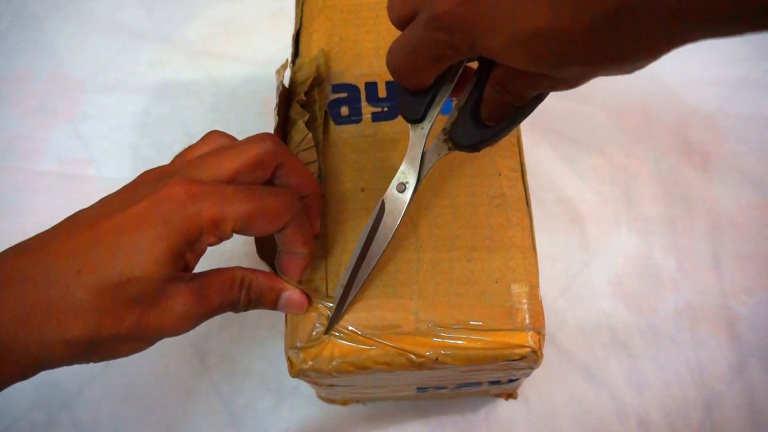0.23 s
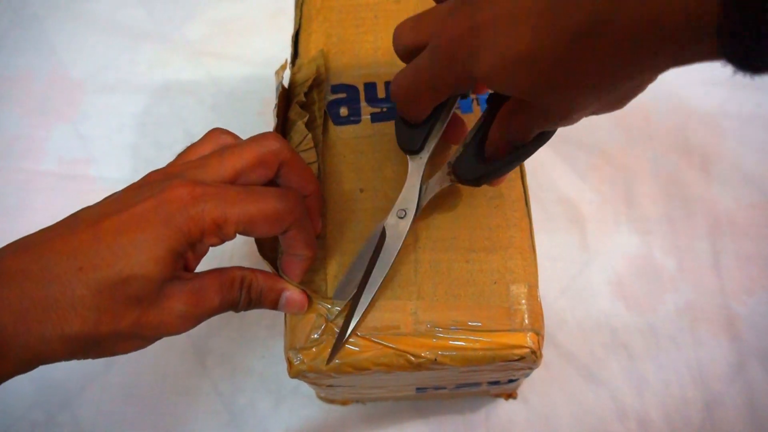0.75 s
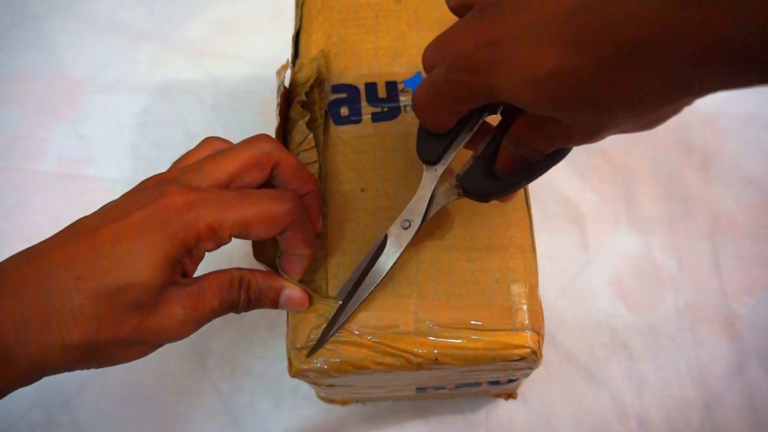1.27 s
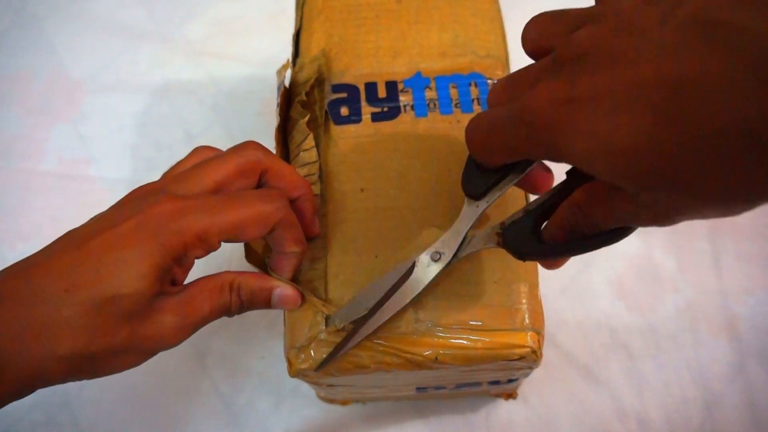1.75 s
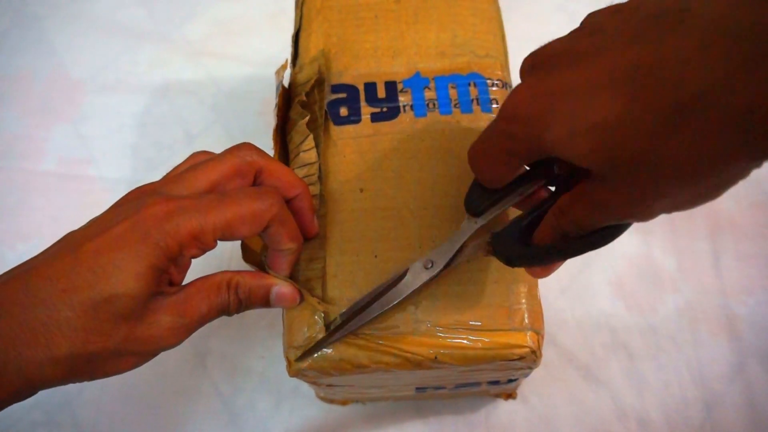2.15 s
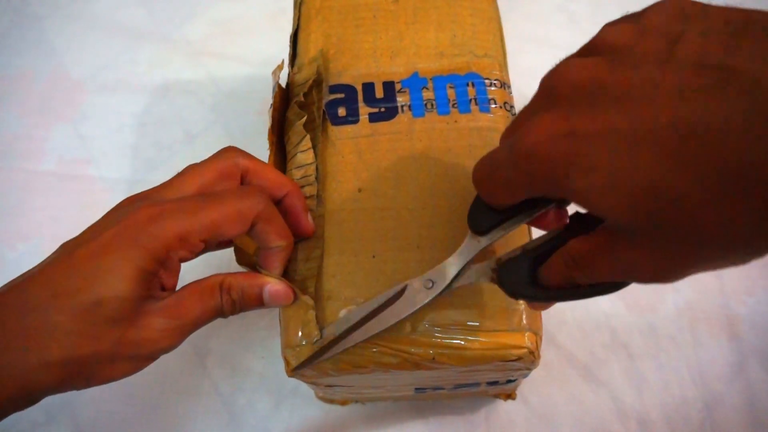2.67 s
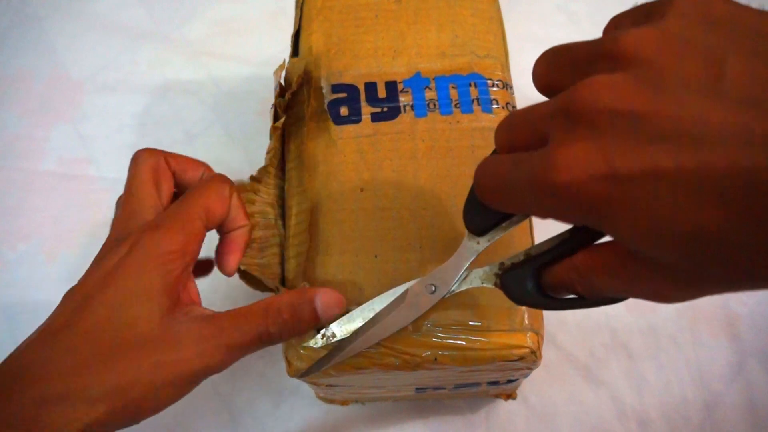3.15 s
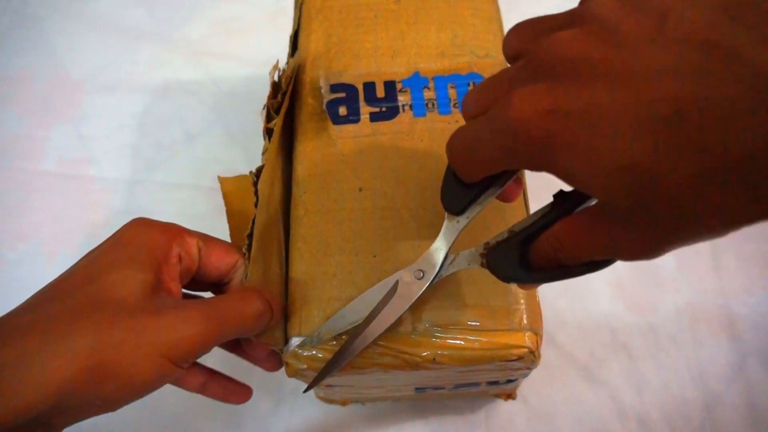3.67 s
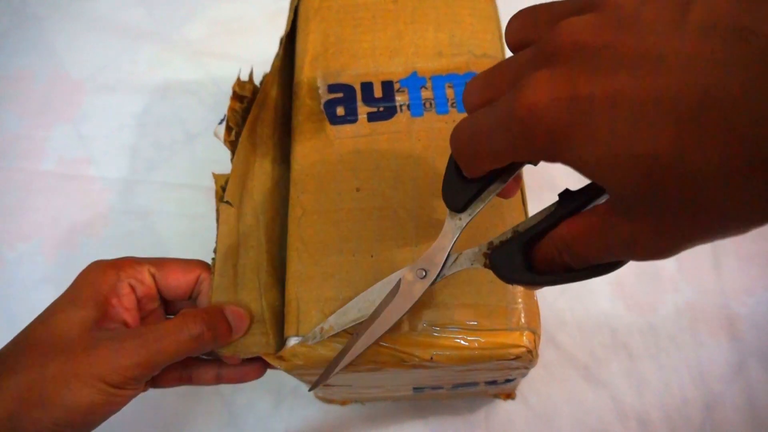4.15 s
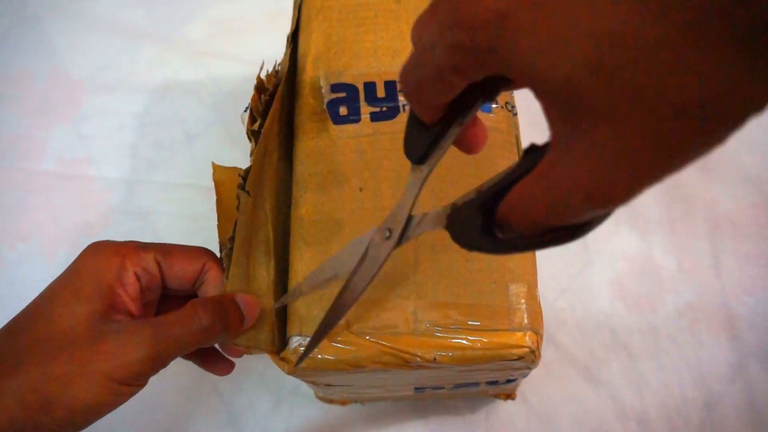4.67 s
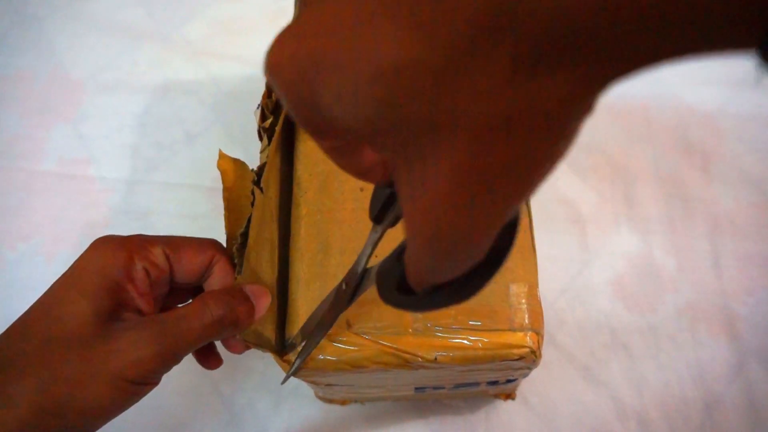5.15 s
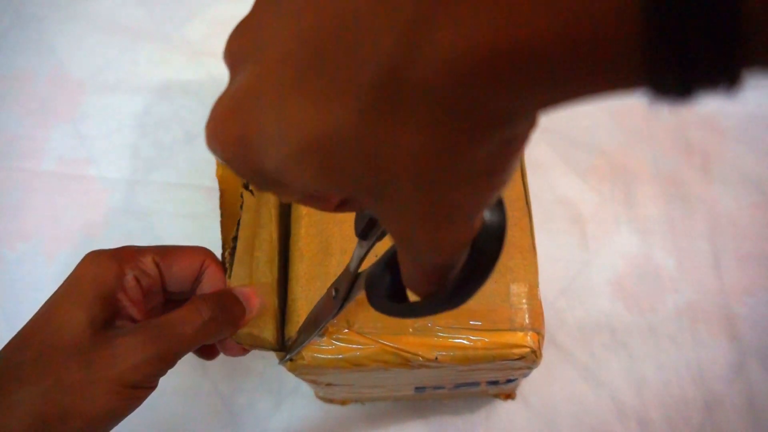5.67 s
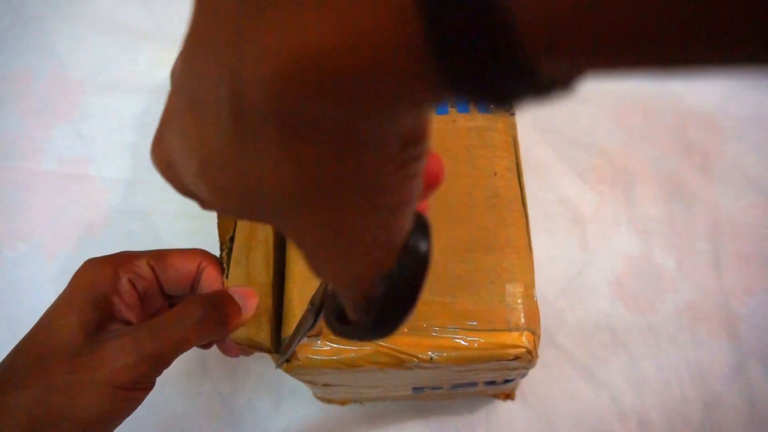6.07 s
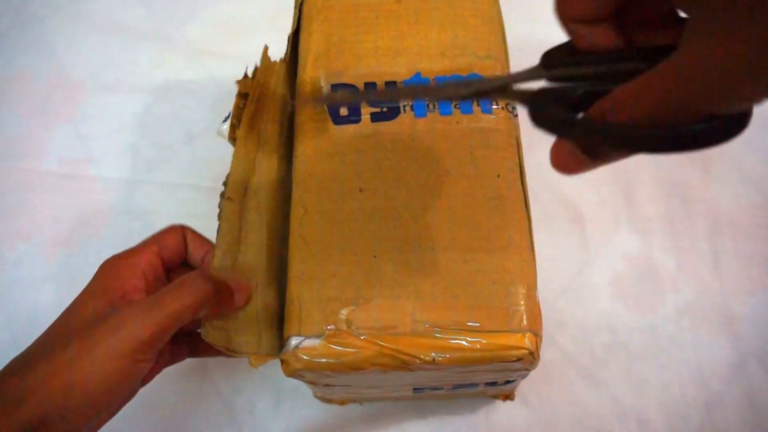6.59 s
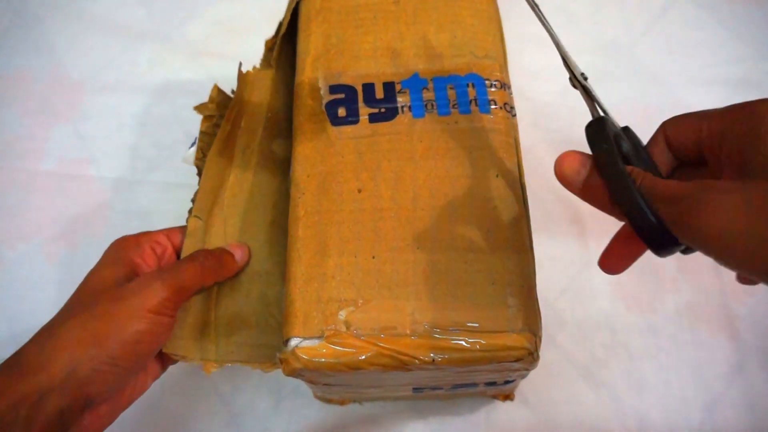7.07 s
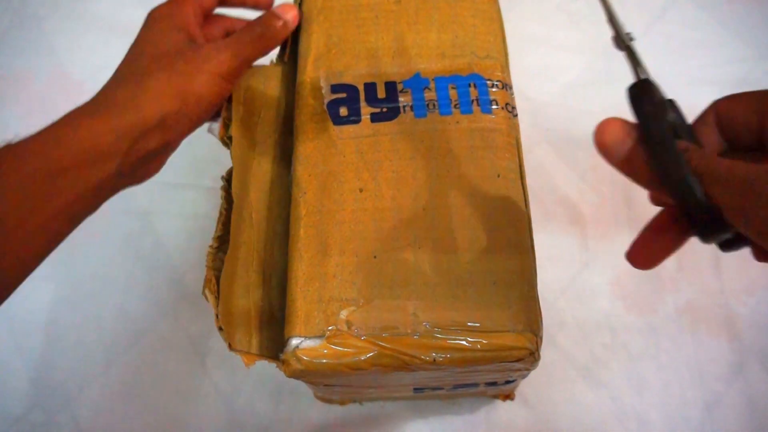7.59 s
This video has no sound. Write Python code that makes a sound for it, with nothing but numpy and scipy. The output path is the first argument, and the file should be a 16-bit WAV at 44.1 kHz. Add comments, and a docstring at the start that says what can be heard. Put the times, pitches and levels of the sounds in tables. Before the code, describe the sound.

Scissor blades dig into taped cardboard very close to the microphone. Dry, bright tape snaps and fine crackles come in irregular clusters, mixed with short fibrous rasps and dull card rubs. The strongest snaps fall around four seconds, then a quieter spell, then scraping and a loud snap with hollow box knocks at seven. A small bare room adds a short reverberant tail over soft room noise and faint hum.

```python
"""Scissors work through the packing tape of a cardboard box, close to a phone in a small bare room.
Tape snaps and crackles are short pulses shaped by the ring of the patch that gives way.
Blade and finger strokes are showers of grains and noise; box and blades are struck modes; bumps are thuds.
One wall echo and a tail of fading noise bands answer the work, over room noise and a faint hum."""
import sys
import numpy as np
from scipy import signal
from scipy.fft import rfft, irfft, next_fast_len
from scipy.io import wavfile
from scipy.ndimage import uniform_filter1d

SR = 44100
rng = np.random.default_rng(int(sys.argv[2]) if len(sys.argv) > 2 else 0)


def dump_mix(stems):
    """Bounce the given channels to the path in sys.argv[1] as a 16-bit WAV at rate SR."""
    frames = np.atleast_2d(stems).T  # one column per channel
    limited = np.clip(frames, -1, 1)  # hard clip at full scale
    pcm = np.round(limited * 32767).astype(np.int16)
    wavfile.write(sys.argv[1], SR, pcm)


N = 345303
TIME_S = np.arange(N) / SR


def undb(db):
    """Decibels to gain."""
    return 10 ** (np.asarray(db) / 20)


def unit(x):
    """Scale to rms 1."""
    return x / np.sqrt(np.mean(x ** 2))


def burst(x, seconds):
    """Scale to the energy that rms 1 has over the given time."""
    return x * np.sqrt(seconds * SR / np.sum(x ** 2))


def along(points, hz):
    """Read (frequency [Hz], value) points on a log-frequency axis."""
    f, value = np.transpose(points)
    return np.interp(np.log(hz + 1e-3), np.log(f), value)


def colour(x, points):
    """Filter by a spectrum of (frequency [Hz], level [dB]) points."""
    size = next_fast_len(len(x) + 2048)
    gain = undb(along(points, np.fft.rfftfreq(size, 1 / SR)))
    return irfft(rfft(x, size) * gain, size)[:len(x)]


def pulse(power):
    """Minimum-phase pulse: the sharpest causal one with a given power spectrum."""
    cepstrum = irfft(np.log(power + 1e-18) / 2)
    half = len(cepstrum) // 2
    folded = np.r_[cepstrum[0], 2 * cepstrum[1:half], np.zeros(half)]
    return irfft(np.exp(rfft(folded)))


def walk(rate_hz):
    """Smooth random wander, rms 1."""
    k = max(int(SR / rate_hz), 1)
    steps = np.repeat(rng.standard_normal(N // k + 1), k)
    return unit(uniform_filter1d(steps, k)[:N])


def add(track, time_s, x):
    """Mix a sound in at a given time."""
    i = max(int(time_s * SR), 0)
    track[i:i + len(x)] += x[:max(N - i, 0)]


def grains(rate_hz, spread_db):
    """Tiny fractures at random moments, most weak and a few strong."""
    size = undb(spread_db * np.minimum(rng.exponential(size=N), 4))
    struck_now = rng.random(N) < rate_hz / SR
    return unit(struck_now * size * rng.choice([-1, 1], N))


def spread(mid, other, side_db):
    """Two close microphone ports: diffuse sound differs a little between them."""
    side = colour(other, side_db)
    return np.array([mid + side, mid - side])


# room noise spectrum: (frequency [Hz], relative level [dB per Hz])
FLOOR_SPECTRUM = [(20, -13), (31, -1.5), (42, -17.5), (80, -5.5), (130, -2), (200, 1), (330, 1),
                  (480, -4.5), (720, -5.5), (1500, -9), (3000, -20), (5000, -26), (7700, -25), (10500, -39),
                  (16000, -36)]
# room noise width: (frequency [Hz], side minus mid [dB])
FLOOR_WIDTH = [(60, -17), (110, -11.5), (200, -13.5), (380, -8), (700, -4), (1290, -6.5), (2380, -4.5),
               (4400, -4), (8120, -20), (15000, -26)]
# hum tones: (frequency [Hz], mean level [dB])
HUM_TONES = [(31, -70), (149.5, -71), (199.2, -63), (249, -74.5)]


def background(floor_db=-49.5, hum_db=0, waver_db=0.47):
    """Near-steady filtered noise plus hum tones that waver in level and phase."""
    mid, other = (unit(colour(rng.standard_normal(N), FLOOR_SPECTRUM)) for _ in range(2))
    hum = np.zeros(N)
    for hz, db in HUM_TONES:
        level = undb(db + hum_db + 2 * walk(3.0))
        hum += level * np.sqrt(2) * np.sin(2 * np.pi * hz * TIME_S + 0.83 * walk(5))
    return spread(mid, other, FLOOR_WIDTH) * undb(floor_db + waver_db * walk(13)) + hum


# blade or finger strokes: (start [s], length [s], relative level of crisp tape and fibre rasp [dB],
# relative level of dull card rub [dB])
STROKE_EVENTS = [(0.0, 0.044, -48, -50), (0.06, 0.14, -64, -65), (0.548, .03, -51, -58),
                 (0.646, 0.25, -51.5, -52.5), (0.973, 0.043, -44.5, -47.5), (1.076, 0.17, -52, -58),
                 (1.224, 0.12, -48, -57), (1.368, 0.13, -40.5, -52.5), (1.51, .1, -57, -63),
                 (1.769, 0.03, -41, -47), (1.847, 0.042, -50, -54), (2.172, 0.023, -43, -44),
                 (2.251, 0.048, -46, -47), (2.725, 0.057, -46, -48), (2.812, 0.052, -42, -50.5),
                 (2.976, 0.095, -41.5, -50), (3.042, 0.04, -34, -42), (3.166, 0.07, -41, -40.5),
                 (3.27, 0.14, -43, -44.5), (3.379, 0.052, -37.5, -46.5), (3.457, 0.02, -36, -42.5),
                 (3.552, 0.03, -37.5, -44), (3.616, 0.11, -44.5, -56), (3.883, 0.071, -42, -54),
                 (4.056, 0.024, -36.5, -59), (4.1, 0.079, -50, -71), (4.418, 0.056, -53, -62),
                 (4.5, 0.016, -42, -45), (4.87, 0.11, -57.5, -60), (5.277, 0.025, -52, -65),
                 (5.498, 0.083, -58, -54.5), (5.562, 0.021, -55, -47.5), (5.865, 0.054, -52, -47.5),
                 (5.96, 0.032, -43, -55), (6.084, 0.15, -49.5, -52.5), (6.204, 0.18, -43.5, -51.5),
                 (6.496, .09, -51.5, -52), (6.582, 0.044, -43, -45), (6.65, 0.082, -43, -53),
                 (6.737, 0.057, -42.5, -48.5), (6.883, 0.11, -44.5, -45), (6.957, 0.15, -33.5, -41.5),
                 (7.092, 0.19, -50, -47), (7.305, 0.096, -42.5, -48.5), (7.5, 0.68, -46, -52)]


def strokes(attack_s=0.0098, release_s=0.03, rest_rasp_db=-65, rest_rub_db=-58.5):
    """Rasp and rub strength: strokes bite, hold and let go; between them the hands rest and shift on the box."""
    rasp_power = np.full(N, undb(rest_rasp_db) ** 2)
    rub_power = np.full(N, undb(rest_rub_db) ** 2)
    t = np.arange(SR) / SR
    for start_s, length_s, rasp_db, rub_db in STROKE_EVENTS:
        shape = np.minimum(t / attack_s, 1) * np.exp(-np.maximum(t - length_s, 0) / release_s)
        add(rasp_power, start_s, (undb(rasp_db) * shape) ** 2)
        add(rub_power, start_s, (undb(rub_db) * shape) ** 2)
    return np.sqrt(rasp_power), np.sqrt(rub_power)


# crisp rasp of tape and fibres: (frequency [Hz], relative level [dB per Hz])
RASP_SPECTRUM = [(900, -35), (2000, -16.5), (3200, -2), (5200, -3), (7400, 2), (8700, 2), (10500, -7),
                 (13000, -13), (16000, -18)]
# dull rub of the card: (frequency [Hz], relative level [dB per Hz])
RUB_SPECTRUM = [(70, -25), (130, -7), (230, -19), (400, -0.5), (750, 3), (1100, -7), (1700, 1.5),
                (2800, -9), (4500, -32), (9000, -53)]


def scraping(rasp, rub, rasp_db=-1.5, rub_db=-1.0, slip_db=2.5, fine=0.77):
    """Blade and fingers catch and slip: fibres break in showers over a finer hiss, and the card sounds below."""
    slip = unit(undb(slip_db * walk(90)))
    fibres = grains(rate_hz=2600, spread_db=3.5)
    crisp = unit(colour(fibres + fine * rng.standard_normal(N), RASP_SPECTRUM))
    coarse = grains(rate_hz=900, spread_db=2.0)
    dull = unit(colour(fibres + 0.61 * coarse, RUB_SPECTRUM))
    return slip * (crisp * rasp * undb(rasp_db) + dull * rub * undb(rub_db))


# body of a snap: (frequency [Hz], relative level [dB per Hz])
SNAP_SPECTRUM = [(100, -45), (700, -40), (2500, -56), (4400, -6.5), (5300, -9), (6300, -1), (7400, 6),
                 (8700, -1), (10500, -15.5), (13000, -74), (16000, -41)]
# bright edge of a snap: (frequency [Hz], relative level [dB per Hz])
EDGE_SPECTRUM = [(5000, -30), (8500, 17), (10000, 13), (13000, 5.5), (16000, -6)]


def snap(hz, ring_db, edge_db, ring_q=3.2, under_db=-3, over_db=-6, stiff_hz=6700, card_hz=800,
         card_db=-10, ripple_db=3.0, crumble=0.083, crumble_s=0.0017, size=512):
    """A sharp break crumbles for milliseconds; the freed patch rings a few cycles in uneven modes."""
    f, t = np.fft.rfftfreq(size, 1 / SR) + 1, np.arange(size) / SR
    detune = np.exp(np.array([.04, .18, .1]) * rng.standard_normal(3))
    modes_hz = hz * np.array([1, .52, 1.5]) * detune
    patch = np.zeros(len(f))
    for mode_hz, db in zip(modes_hz, [0, under_db, over_db]):
        patch += undb(2 * db) / (1 + (ring_q * (f / mode_hz - mode_hz / f)) ** 2)
    # smaller, stiffer patches radiate less below their own ring
    radiated = 1 / (1 + (hz ** 2 / stiff_hz / f) ** 10) + .015
    body, edge = (undb(2 * along(points, f)) for points in (SNAP_SPECTRUM, EDGE_SPECTRUM))
    power = np.zeros(len(f))
    for shape, db in [(body, 0), (patch, ring_db), (edge, edge_db)]:
        power += radiated * undb(2 * db) * shape / np.sum(shape * radiated)
    # tug on the card beneath
    card = 1 / (1 + (2 * (f / card_hz - card_hz / f)) ** 2)
    power = power + undb(2 * (ring_db + card_db)) * card / card.sum()
    # reflections off box and hands comb each snap differently
    ripple = ripple_db * unit(uniform_filter1d(rng.standard_normal(len(f)), size=7))
    force = (t == 0) + crumble * rng.standard_normal(size) * np.exp(-t / crumble_s)
    return burst(np.convolve(force, pulse(power * undb(2 * ripple))), power.sum() / 10 ** 3)


def crackle(rasp, rate_hz=55, base_db=-15, follow=0.64, spread_db=3.0, patch_hz=2500, ring_db=-5, edge_db=-8):
    """Strained tape gives way in many small snaps, stronger while the blades rasp."""
    out = np.zeros(N)
    for when, size, pitch, ring, edge in rng.random((int(rate_hz * N / SR), 5)):
        rarity = -np.log(size + 0.014)
        db = base_db + follow * 20 * np.log10(rasp[int(when * N)]) + spread_db * rarity
        hz = patch_hz * 2 ** (2 * pitch - 1)
        small_snap = snap(hz, ring_db + 12 * (ring - .5), edge_db + 14 * (edge - .5))
        add(out, when * N / SR, undb(db) * small_snap)
    return out


# loud tape snaps: (time [s], relative level [dB], patch ring [Hz], relative ring level [dB],
# bright edge relative to body [dB])
SNAP_EVENTS = [(0.013, -33.5, 3700, 0, -22), (0.072, -26.5, 4200, -3, -25), (0.1717, -47, 2400, -15, 10),
               (0.192, -44, 2400, -15, 9), (0.4123, -42, 3000, -6, -1), (0.4325, -36, 2980, -0.5, -10),
               (0.496, -43, 3420, 3, -17), (0.9983, -24, 2280, 1, -22), (1.0555, -28, 2950, -1.5, -8),
               (1.0992, -28.5, 2370, -7, -7), (1.1267, -24.5, 2930, 1, -13), (1.1855, -34, 1770, 3.5, 0),
               (1.232, -21.5, 2750, 1, -5), (1.3059, -22, 3720, -5.5, -3), (1.402, -25.5, 2240, -5, -6),
               (1.432, -37, 3720, -6, 8), (1.476, -23, 2870, -20, -8), (1.4885, -16.5, 3160, -13, -9),
               (1.4922, -23.5, 2530, 0.5, 3), (1.5475, -32, 3300, 3, -12), (1.6004, -17.5, 2400, -9.5, -9),
               (1.7718, -32, 2440, -7, -6), (1.8859, -34.5, 3790, -4, -5), (2.1834, -32, 2140, 6, -6),
               (2.2016, -29.5, 3850, -1, -16), (2.2522, -26, 3270, 1, -17), (2.265, -24.5, 4100, -4, -15),
               (2.274, -30, 2050, 10.5, -12), (2.2951, -20, 3010, -7.5, -7), (2.465, -39.5, 3330, 10, -12),
               (2.4999, -33, 1800, 2.5, 6), (2.5292, -37, 3100, 16, -14), (2.7065, -31.5, 3280, -4.5, -24),
               (2.8029, -25, 2190, 0, -4), (2.8092, -22, 2500, -0.5, -21), (2.9512, -31.5, 1580, 2, -12),
               (3.1867, -27.5, 3100, -3.5, -8), (3.365, -26, 4190, -2, -13), (3.473, -21, 2670, -15, -5),
               (3.572, -27.5, 3400, 3.5, 2), (3.6485, -28.5, 3100, 3, -13), (3.8166, -30.5, 2830, 6, -9),
               (3.8304, -23.5, 3690, -8, -17), (3.8547, -26, 3260, 0, -4), (3.8674, -23, 3370, -12, -7),
               (3.8877, -12.5, 2700, -1, -5.5), (3.9156, -14.5, 4670, -9.5, -7.5),
               (4.0363, -10.5, 4800, 2, -19), (4.41, -34, 4260, 6.5, -13), (4.434, -37.5, 4050, 4, -19),
               (4.463, -38.5, 2620, 5, -7), (4.513, -41.5, 990, 11.5, 3), (4.8278, -31, 4950, -9, -33),
               (4.8597, -31.5, 4350, 0.5, -21), (4.9793, -33, 4850, 1.5, -23),
               (5.1755, -36.5, 1110, -2.5, -13), (5.3701, -38, 2380, -11, -4), (5.5781, -29, 3000, -19, -3),
               (5.8738, -30.5, 5600, 2.5, -16), (5.9414, -27.5, 4430, -1.5, -16), (6.163, -41, 1020, 8, 4),
               (6.2114, -22.5, 2500, -6, -18), (6.36, -23.5, 3200, 0, -16), (6.964, -21, 3400, 2.5, -4),
               (6.9865, -33.5, 3100, 13.5, -12), (7.0261, -15.5, 2700, -4, -10),
               (7.035, -10.5, 2350, -6, -5), (7.0388, -16, 2780, 0.5, 1), (7.4143, -17, 5600, -4, -20)]


def snaps(snap_db=-0.57, ring_db=0, card_db=-11, card_db_per_octave=-7, usual_hz=3000,
          send_db=-4, send_db_per_octave=4.5):
    """Loud snaps; a smaller patch tugs the card less and throws more of its sound into the room."""
    near, sent = np.zeros(N), np.zeros(N)
    for time_s, db, hz, ring, edge in SNAP_EVENTS:
        octaves = np.log2(hz / usual_hz)
        tug_db = card_db + card_db_per_octave * max(octaves, 0)
        add(near, time_s, undb(db + snap_db) * snap(hz, ring + ring_db, edge, card_db=tug_db))
        # the room gathers all directions, evening out peaks and notches
        even = snap(hz, ring + ring_db, edge, ring_q=2.6, under_db=-12, card_db=-21, ripple_db=0, crumble=0)
        add(sent, time_s, undb(db + send_db + send_db_per_octave * octaves) * even)
    return near, sent


# reverberation time: (frequency [Hz], t60 [s])
TAIL_T60 = [(150, 0.69), (400, 1), (1500, 0.74), (5000, 0.92), (8000, 0.69), (15000, 0.41)]
# tail colour: (frequency [Hz], relative level [dB])
TAIL_COLOUR = [(60, -14), (110, -14), (150, 4), (200, -2), (300, -0.5), (600, -5.5), (2000, -2.5),
               (3200, -2), (5000, -1), (8000, -4), (11000, -3), (15000, -5)]
# room sound width: (frequency [Hz], side minus mid [dB])
TAIL_WIDTH = [(50, -18), (160, -46), (300, -33), (700, -15), (1500, -15), (3000, -13.5), (6000, -24),
              (9000, -6), (14000, -74)]


def room(x, tail_db=0, echo_s=0.011, echo_db=-13, build_s=0.0089):
    """One near wall answers; a dense tail of noise bands builds up and fades, the extreme top soonest."""
    t = np.arange(int(1.2 * SR)) / SR
    hz = np.fft.rfftfreq(len(t), 1 / SR)
    centres_hz = np.geomspace(100, 16000, 9)
    noise, tail = rfft(rng.standard_normal((2, len(t)))), 0
    for centre_hz, pick in zip(centres_hz, np.eye(len(centres_hz))):
        decay = np.exp(-np.log(1000) * t / along(TAIL_T60, centre_hz))
        fade = decay * (1 - np.exp(-(t / build_s) ** 2))
        band = np.interp(np.log(hz + 1), np.log(centres_hz), pick)
        band = band * undb(along(TAIL_COLOUR, hz) + tail_db)
        tail = tail + irfft(noise * band, len(t)) * burst(fade, 1 / SR)
    tail[0, int(echo_s * SR)] += undb(echo_db)
    mid, other = (signal.fftconvolve(x, response)[:N] for response in tail)
    return spread(mid, other, TAIL_WIDTH)


def struck(modes, t):
    """Decaying modes of alternating sign, a little different on every blow."""
    gains = undb(2 * rng.standard_normal(len(modes)))
    out = np.zeros(len(t))
    for k, (hz, db, t60_s) in enumerate(modes):
        decay = np.exp(-np.log(1000) * t / t60_s)
        out += (-1) ** k * gains[k] * undb(db) * np.sin(2 * np.pi * hz * t) * decay
    return out


# knocks on the hollow box: (time [s], level [dB])
BOX_KNOCKS = [(1.488, -34.5), (2.281, -38), (2.802, -37), (2.81, -31.5), (3.187, -42), (3.571, -41.5),
              (3.888, -40.5), (4.037, -35.5), (4.513, -37), (5.175, -42.5), (5.467, -43), (5.579, -37.5),
              (5.876, -38.5), (6.161, -32), (6.211, -42), (6.363, -38), (6.967, -28), (6.988, -27),
              (7.024, -27.5), (7.035, -22.5)]
# box panels: (frequency [Hz], mean relative level [dB], t60 [s])
PANEL_MODES = [(150.4, -12, 0.38), (195, -4.5, 0.098), (225, 3, 0.059), (313, 0.5, 0.07), (483, -11, 0.042),
               (690, -19, 0.035)]


def box(thump_db=0, push_s=0.00026, buckle=0.027, buckle_s=0.01, low_hz=122):
    """A knock bends the card, which buckles briefly and rings the panels; the small box radiates little bass."""
    out, t = np.zeros(N), np.arange(SR // 4) / SR
    radiate = signal.butter(3, low_hz, "high", fs=SR, output="sos")
    for time_s, db in BOX_KNOCKS:
        force = np.exp(-t / push_s) + buckle * rng.standard_normal(len(t)) * np.exp(-t / buckle_s)
        ringing = signal.fftconvolve(struck(PANEL_MODES, t), force)[:len(t)]
        knock = signal.sosfilt(radiate, ringing)
        add(out, time_s, undb(db + thump_db) * burst(knock, 0.015))
    return out


# blades knocking together: (time [s], level [dB])
BLADE_KNOCKS = [(2.4997, -35)]
# steel blades: (frequency [Hz], mean relative level [dB], t60 [s])
STEEL_MODES = [(1510, -4, 0.076), (1660, -2, 0.017), (4260, -14, 0.043)]


def blades():
    """The steel rings briefly, damped by the hand."""
    out, t = np.zeros(N), np.arange(SR // 5) / SR
    for time_s, db in BLADE_KNOCKS:
        add(out, time_s, undb(db) * burst(struck(STEEL_MODES, t), 0.0092))
    return out


# box rocking on the cloth-covered table: (time [s], level [dB])
TABLE_BUMPS = [(6.365, -45), (6.895, -46)]
# dull thud: (frequency [Hz], relative level [dB per Hz])
THUD_SPECTRUM = [(30, -12), (55, -10), (100, -4), (150, -3), (260, -20), (600, -60)]


def bumps(swell_s=0.017):
    """The box settles on the table: low noise under a soft swell and decay."""
    force, t = np.zeros(N), np.arange(SR // 2) / SR
    for time_s, db in TABLE_BUMPS:
        add(force, time_s, undb(db) * t / swell_s * np.exp(1 - t / swell_s))
    return force * unit(colour(rng.standard_normal(N), THUD_SPECTRUM))


def scene(scrape_send_db=-2.0, box_send_db=-2, blade_send_db=-10, left_db=0.1, port_skew_samples=0.098):
    """Work close and almost straight ahead; the room answers all of it but the table bumps."""
    near, sent = snaps()
    rasp, rub = strokes()
    cutting = scraping(rasp, rub) + crackle(rasp)
    knocks, steel = box(), blades()
    sent = sent + undb(scrape_send_db) * cutting
    sent = sent + undb(box_send_db) * knocks + undb(blade_send_db) * steel
    direct = near + cutting + knocks + steel + bumps()
    # left port leads the right by a few microseconds
    lead = port_skew_samples * np.gradient(direct)
    ports = np.array([direct + lead, direct - lead])
    return (ports + room(sent) + background()) * undb([[left_db], [-left_db]])


def record(dry, ceiling=.85, top_hz=16100):
    """The sharpest peaks are gently rounded, and the phone cuts the top."""
    rounded = ceiling * np.tanh(dry / ceiling)
    low_pass = signal.ellip(10, .2, 90, top_hz, fs=SR, output="sos")
    return signal.sosfilt(low_pass, rounded)


dry = scene()
out = record(dry)
dump_mix(out)
```